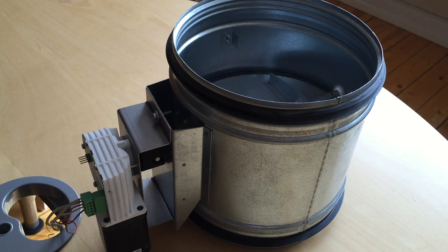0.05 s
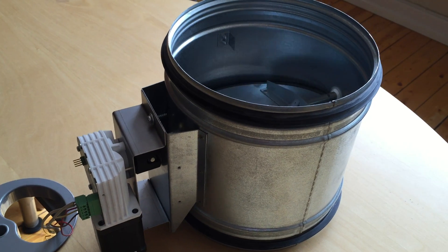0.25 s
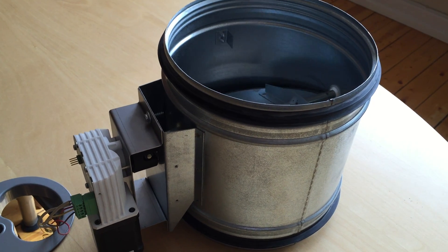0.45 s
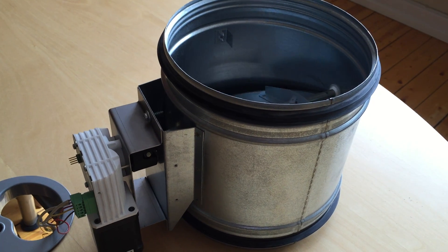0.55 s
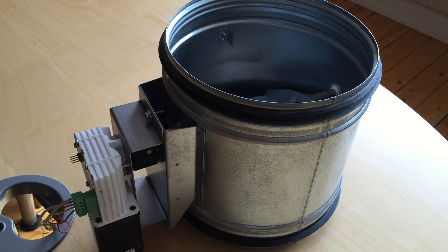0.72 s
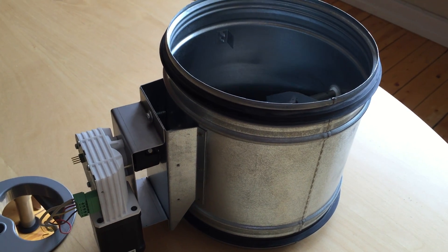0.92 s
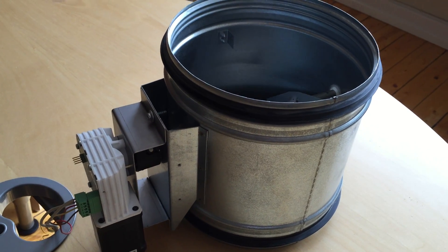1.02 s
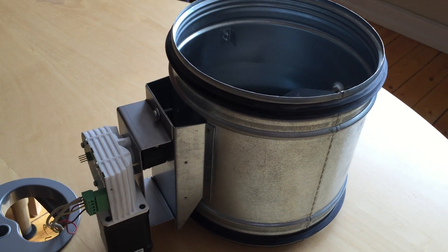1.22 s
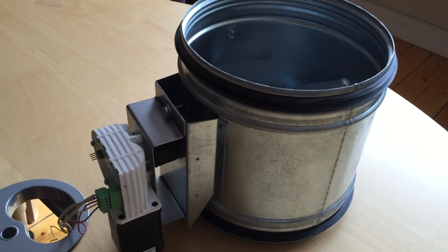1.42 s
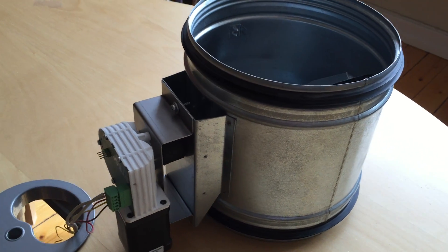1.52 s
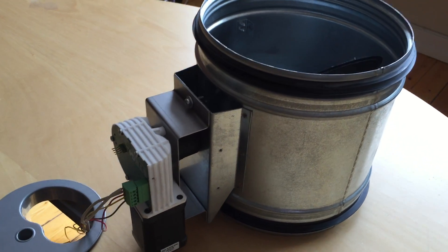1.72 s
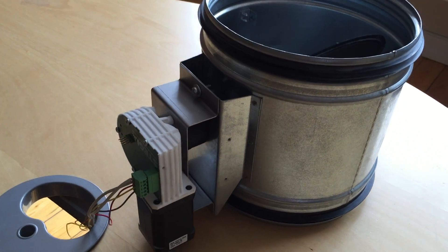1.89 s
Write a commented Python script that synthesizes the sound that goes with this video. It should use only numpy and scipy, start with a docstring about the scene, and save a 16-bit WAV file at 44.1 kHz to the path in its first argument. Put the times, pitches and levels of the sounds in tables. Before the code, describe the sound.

Sheet-metal damper knocks and rings, its linkage clacking twice over a low room rumble.

```python
"""Duct damper on a living-room table

One microphone, close by. A small stepper motor turns the blade of a sheet-metal damper. The blade
binds, rubs and breaks free with a hollow knock that rings duct and room; the slack linkage clacks twice.
Motor and mains hum on over a low rumble, with faint scrapes, low throbs and soft thuds."""
import sys
import numpy as np
from scipy import signal
from scipy.fft import rfft, irfft
from scipy.io import wavfile
from scipy.ndimage import uniform_filter1d

SR = 44100
rng = np.random.default_rng(int(sys.argv[2]) if len(sys.argv) > 2 else 0)


def pcm_store(signal):
    """Save signal as 16-bit PCM."""
    levels = np.round(np.clip(np.atleast_2d(signal), -1, 1) * 32767)
    wavfile.write(sys.argv[1], SR, levels.astype(np.int16).T)


N = 85995

# room tone, low rumble and faint hiss: frequency_hz, relative_db
RUMBLE_SPECTRUM = [(20, -32), (45, -7.5), (80, -9), (140, -0.5), (200, -7), (265, -3), (325, -18.5),
                   (385, -26), (550, -44)]
HISS_SPECTRUM = [(350, -7), (450, -6.5), (600, -0.5), (800, -5), (1050, -4.5), (1700, -7.5), (3000, -10),
                 (5000, -15.5), (9000, -18.5), (10500, -22), (15700, -20.5)]
# stepper tones, and mains hum at 200 and 300 Hz: pitch_hz, level_db
HUM_TONES = [(81.3, -72), (162.6, -55), (200, -60.5), (244, -57), (300, -71), (325.2, -78), (603, -88)]
# rise and fall of the whole hum: time_s, gain_db
HUM_CONTOUR = [(0, 3.5), (.6, 0), (1.1, -2), (1.5, -4), (1.75, -2), (1.95, -12)]
# soft thuds, and low throbs in the ring after the knock: start_s, level_db, pitch_hz, t60_s
THUDS_AND_THROBS = [(.003, -41, 190.8, 0.33), (.07, -48, 212, 0.25), (.139, -38.5, 197, 0.15),
                    (0.251, -28, 99.4, 0.12), (0.299, -32.5, 199, 0.17), (.315, -39.5, 99.5, 0.34),
                    (0.393, -34, 183.5, 0.12), (0.454, -39, 245, 0.13), (.548, -39, 277, 0.089),
                    (0.6463, -48, 326, 0.074), (0.6991, -35.5, 650, 0.033), (0.7021, -35.5, 326.5, 0.094),
                    (1.44, -50.5, 88, 0.27), (1.71, -40, 181, 0.042), (1.739, -37.5, 122, 0.034),
                    (1.792, -41, 88, .12), (1.878, -43.5, 200, 0.05), (1.895, -48, 77.6, 0.097)]
# blade scrapes, and a brief soft hiss around the first clack:
# peak_s, rise_s, fall_s, level_db, centre_hz, width_octaves
SCRAPES_AND_HISS = [(0.139, 0.019, 0.06, -65.5, 4170, 1.5), (0.158, 0.007, 0.017, -61, 5560, 1.34),
                    (.191, 0.0012, 0.011, -63, 6000, 0.8), (0.221, 0.0088, 0.0088, -55, 4900, 2.4),
                    (0.242, 0.0044, 0.012, -62.5, 11100, 2.2), (.45, 0.011, 0.015, -73, 5160, 0.36),
                    (.45, 0.0061, 0.015, -77, 13500, 0.4), (.51, 0.11, 0.11, -67, 2180, 1.42),
                    (.51, 0.052, 0.061, -59.5, 623, 0.37), (.549, 0.016, 0.013, -70.5, 5270, 1),
                    (0.641, 0.011, 0.017, -64, 2000, 2.06), (0.888, 0.0059, 0.04, -74.5, 4270, 0.11),
                    (.92, 0.025, 0.076, -67.5, 1300, 1.1), (1.126, 0.052, 0.019, -70.5, 670, 0.055),
                    (1.145, 0.018, 0.027, -72.5, 2980, 0.31), (1.198, 0.015, 0.068, -71.5, 3340, 0.24),
                    (1.426, 0.023, 0.055, -72, 2870, 1.14), (1.84, 0.054, 0.15, -72.5, 675, 1.04)]

# blows on each metal part: start_s, level_db, treble_corner_hz, bass_corner_hz
LINKAGE_CLACKS = [(.6453, -2, 5700, 450), (.7030, -9.5, 3970, 2700), (.889, -25, 5000, 1460)]
BLADE_SNAPS = [(.2236, -1.5, 15600, 1180), (.2333, -17, 4000, 1500), (.2425, -14, 16000, 10000)]
DUCT_KNOCKS = [(.062, -25.5, 624, 195), (.1985, -13.5, 860, 263), (.2203, -16.5, 1800, 149),
               (.2255, -2.5, 1740, 116), (.2285, -7.5, 556, 91), (.2425, -21, 690, 88.5),
               (.2615, -11, 630, 70), (.551, -33.5, 560, 249), (.7008, -17.5, 770, 580)]
# clear modes of linkage and blade: pitch_hz, level_db, t60_s
LINKAGE_MODES = [(675, -38, .035), (1120, -42, .045), (1254, -38, .05), (1868, -30, .042), (2132, -49, .04),
                 (2482, -48, .05), (3025, -43, .035), (3300, -48, .025), (5712, -58, .04), (6600, -55, .04),
                 (7908, -58, .05)]
BLADE_MODES = [(2434, -30.5, 0.038), (2520, -33, 0.066), (2843, -49, 0.069), (3150, -45, 0.078),
               (4520, -44, .04), (5140, -52, .04), (8300, -65.5, 0.28)]
# three low room resonances that the knock excites, then the duct's ring: pitch_hz, level_db, t60_s
ROOM_AND_DUCT_MODES = [(96.5, -30, .42), (178.5, -29, .85), (201.5, -30, .9), (262, -26, .32),
                       (317, -32, .28), (366, -32, .24), (617, -39, .25), (275, -24, .07), (465, -29, .1),
                       (535, -34, .1), (683, -34, .05), (890, -27, .05), (927, -44, .35), (1110, -27, .06),
                       (1216, -23, .05), (1260, -47, .9), (1895, -44, .08), (1080, -48, .5),
                       (1200, -49, .7), (1850, -56, .8)]
# dense overtones of each part: centre_hz, crack_db, tail_db, tail_t60_s
LINKAGE_OVERTONES = [(440, -52, -60, 0.34), (760, -35, -58, 0.28), (1250, -36, -52.5, 0.53),
                     (1540, -70, -57, 0.45), (1850, -43.5, -51, 0.35), (3100, -55, -61.5, 0.45),
                     (4020, -71, -94, 0.14), (6800, -45, -61.5, 0.28), (14200, -59, -64, 0.11)]
BLADE_OVERTONES = [(1690, -41, -52.5, 0.64), (2350, -49, -52, 0.62), (3800, -49, -63, 0.67),
                   (4900, -43.5, -63, 0.39), (8000, -61, -65, 0.28), (10800, -70, -73, 0.25),
                   (14800, -45, -56, 0.15)]
DUCT_OVERTONES = [(87, -18, -44, 1), (253, -17, -39, 0.9), (463, -42, -36.5, 0.42), (925, -53, -44, 0.58),
                  (1210, -27, -47.5, 0.91), (1480, -60, -49, 0.28), (2370, -28, -46, 0.41),
                  (4200, -45, -34, 0.13), (8400, -39, -59, 0.42), (15000, -46, -58, .14)]

RUMBLE_DB, HISS_DB = -57.5, -72
HUM_WAVER_DB, HUM_WAVER_HZ, HUM_PHASE_RAD = 1.5, 3, .25
TICKS_PER_S, TICK_GAIN = 600, 0.53
MIC_BASS_HZ, MIC_TOP_HZ = 56, 15750


def undb(db):
    """Decibels to gain."""
    return 10 ** (np.asarray(db) / 20)


def unit(x):
    """Scale to rms 1."""
    return x / np.sqrt(np.mean(x ** 2) + 1e-24)


def freqs():
    """Frequency axis in Hz."""
    return np.maximum(np.arange(N // 2 + 1) * SR / N, 1)


def shaped(x, gain):
    """Filter by a gain per frequency, to rms 1."""
    return unit(irfft(rfft(x) * gain, N))


def noise(spectrum):
    """Noise drawn through (frequency_hz, relative_db) points, at rms 1."""
    hz, db = np.array(spectrum).T
    curve_db = np.interp(np.log(freqs()), np.log(hz), db, left=-200, right=-200)
    return shaped(rng.standard_normal(N), undb(curve_db))


def fade(t, t60):
    """Exponential decay, 60 dB down after t60 seconds."""
    return np.exp(-np.log(1000) * t / max(t60, 1e-3))


def wander(rate_hz):
    """Slow random drift at rms 1."""
    return shaped(rng.standard_normal(N), np.exp(-(freqs() / rate_hz) ** 2))


def burst(t, t60, smoothing_hz=150):
    """A short decaying burst of noise with an even spectrum."""
    spectrum = rfft(rng.standard_normal(N) * fade(t, t60))
    local_power = uniform_filter1d(abs(spectrum) ** 2, size=int(smoothing_hz * N / SR))
    return irfft(spectrum / np.sqrt(local_power), N)


def room_tone():
    """The living room behind the damper: low rumble and faint hiss."""
    return undb(RUMBLE_DB) * noise(RUMBLE_SPECTRUM) + undb(HISS_DB) * noise(HISS_SPECTRUM)


def motor_and_mains(t):
    """Low stepper tones and mains hum, each wavering slightly."""
    hum = np.zeros(N)
    for hz, db in HUM_TONES:
        amplitude = np.sqrt(2) * undb(db + HUM_WAVER_DB * wander(HUM_WAVER_HZ))
        phase = 2 * np.pi * (hz * t + rng.random()) + HUM_PHASE_RAD * wander(HUM_WAVER_HZ)
        hum += amplitude * np.sin(phase)
    return hum * undb(np.interp(t, *np.array(HUM_CONTOUR).T))


def thuds_and_throbs(t, rise_s=0.0013):
    """Quickly damped low tones: soft thuds, and throbs in the ring after the knock."""
    out = np.zeros(N)
    for start_s, db, hz, t60 in THUDS_AND_THROBS:
        age = np.maximum(t - start_s, 0)
        envelope = (1 - np.exp(-age / rise_s)) * fade(age, t60)
        out += undb(db) * np.sin(2 * np.pi * hz * age) * envelope
    return out


def scrapes_and_hiss(t):
    """Grainy noise swells and dies: the blade's stick-slip rubbing, and a hiss at the first clack."""
    out = np.zeros(N)
    for peak_s, rise_s, fall_s, db, hz, octaves in SCRAPES_AND_HISS:
        ticks = unit((rng.random(N) < TICKS_PER_S / SR) * rng.standard_normal(N))
        band = 1 / (1 + (np.log2(freqs() / hz) / octaves) ** 2) ** 2
        grain = shaped(TICK_GAIN * ticks + .5 * rng.standard_normal(N), band)
        swell = np.exp(-np.where(t < peak_s, ((t - peak_s) / rise_s) ** 2, (t - peak_s) / fall_s))
        out += undb(db) * grain * swell
    return out


def tap_ring(t, modes, overtones, crack_t60_s):
    """One tap on metal, heard in the room: clear modes, a crack of dense overtones and their tail."""
    out = sum(undb(db) * np.sin(2 * np.pi * hz * t) * fade(t, t60) for hz, db, t60 in modes)
    centres_hz = [row[0] for row in overtones]
    bass_cut = 1 / np.sqrt(1 + (centres_hz[0] / freqs()) ** 8)
    crack = burst(t, crack_t60_s)
    crack_rms = np.sqrt(np.mean(fade(t, crack_t60_s) ** 2))
    for share, (_, crack_db, tail_db, t60) in zip(np.eye(len(overtones)), overtones):
        band = np.interp(np.log(freqs()), np.log(centres_hz), share) * bass_cut  # neighbours crossfade
        tail = shaped(rng.standard_normal(N), band) * fade(t, t60)
        out += undb(crack_db) * crack_rms * shaped(crack, band) + undb(tail_db) * tail
    return out


def strike(blows, ring):
    """Each blow rings the part; soft contact loses treble, light contact loses bass."""
    force = np.zeros(N)
    for start_s, db, treble_hz, bass_hz in blows:
        push = np.zeros(N)
        push[int(start_s * SR)] = undb(db)
        push = signal.lfilter(*signal.butter(2, treble_hz, fs=SR), push)
        force += signal.lfilter(*signal.butter(2, bass_hz, "high", fs=SR), push)
    return signal.fftconvolve(force, ring)[:N]


def linkage_clacks(t):
    """The slack linkage clacks twice, then gives a faint tick."""
    return strike(LINKAGE_CLACKS, tap_ring(t, LINKAGE_MODES, LINKAGE_OVERTONES, crack_t60_s=0.019))


def blade_snaps(t):
    """The blade's edge snaps free and rebounds with a bright ring."""
    return strike(BLADE_SNAPS, tap_ring(t, BLADE_MODES, BLADE_OVERTONES, crack_t60_s=0.034))


def duct_knocks(t):
    """Blows ring the hollow duct and the room's low resonances, hardest as the blade breaks free."""
    return strike(DUCT_KNOCKS, tap_ring(t, ROOM_AND_DUCT_MODES, DUCT_OVERTONES, crack_t60_s=0.008))


def scene():
    """Damper, hum and room in mono, close to the table."""
    t = np.arange(N) / SR
    damper = duct_knocks(t) + linkage_clacks(t) + blade_snaps(t) + scrapes_and_hiss(t)
    return (damper + thuds_and_throbs(t) + motor_and_mains(t) + room_tone())[None]


def record(dry):
    """Microphone and recorder lose the deepest bass and cut the top steeply."""
    thinned = signal.sosfilt(signal.butter(3, MIC_BASS_HZ, "high", fs=SR, output="sos"), dry)
    return signal.sosfilt(signal.ellip(10, .2, 70, MIC_TOP_HZ, fs=SR, output="sos"), thinned)


dry = scene()
out = record(dry)
pcm_store(out)
```